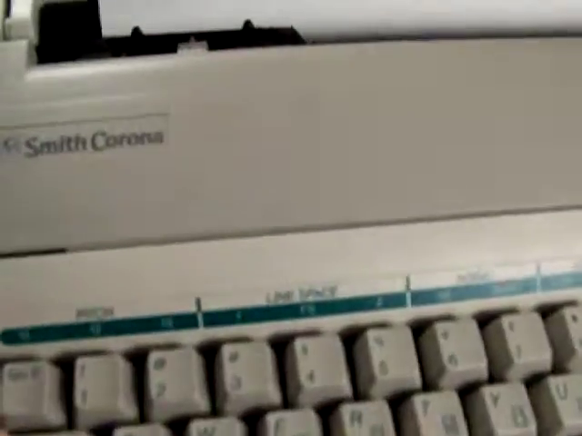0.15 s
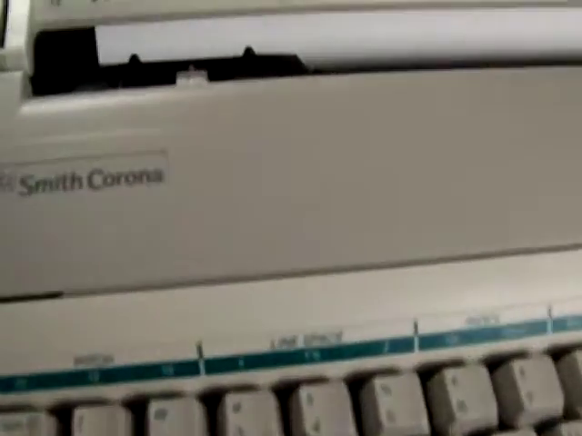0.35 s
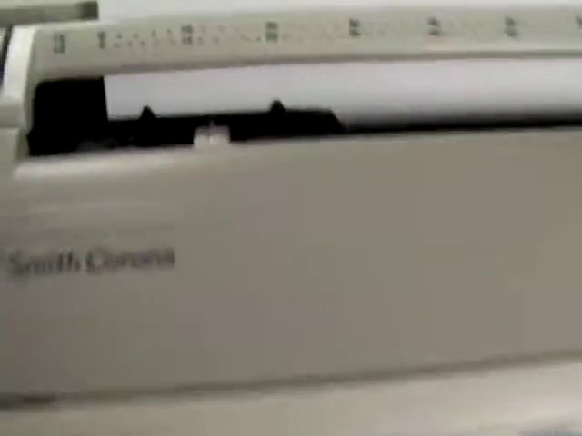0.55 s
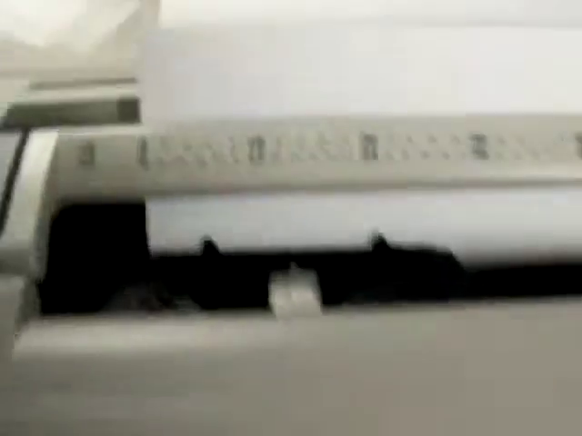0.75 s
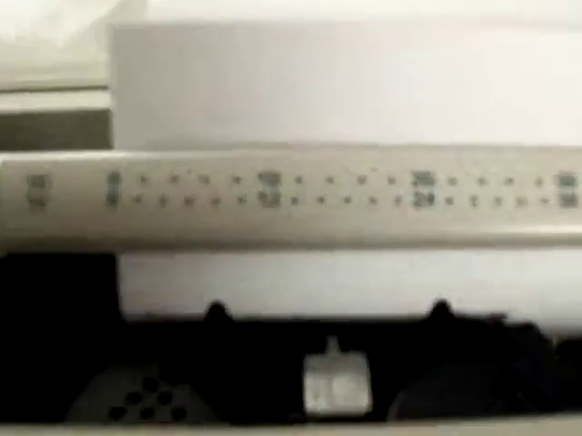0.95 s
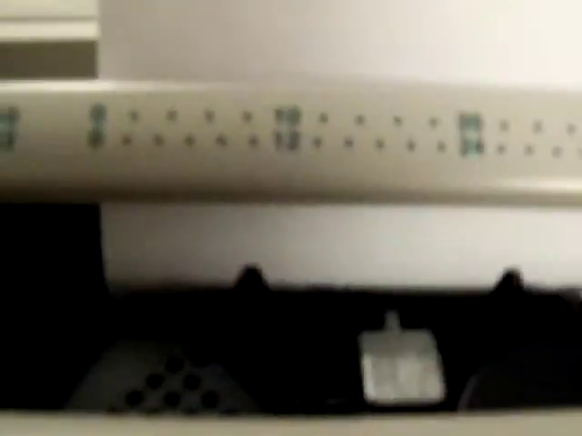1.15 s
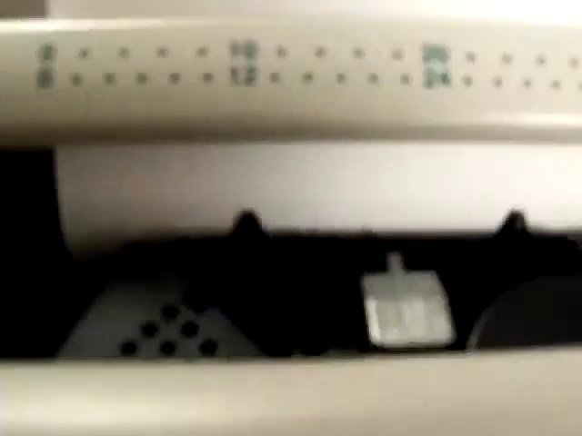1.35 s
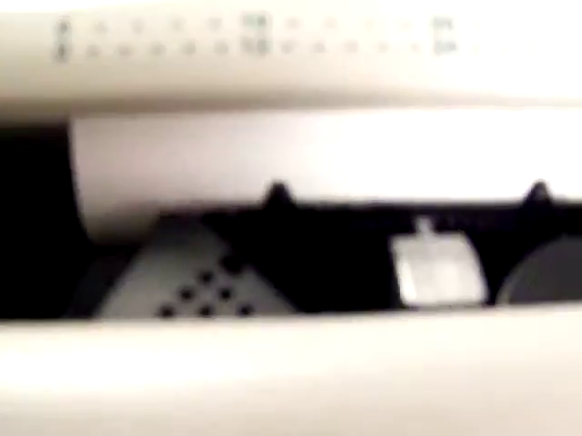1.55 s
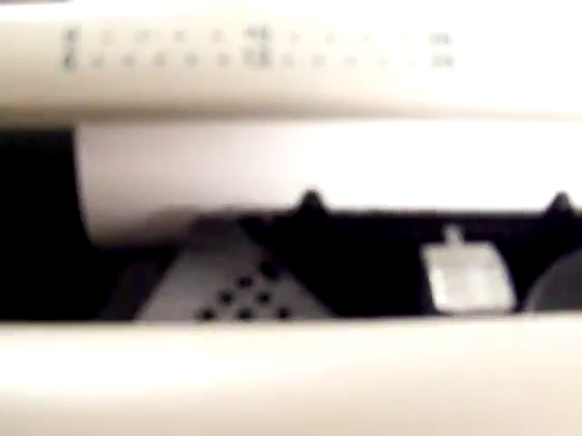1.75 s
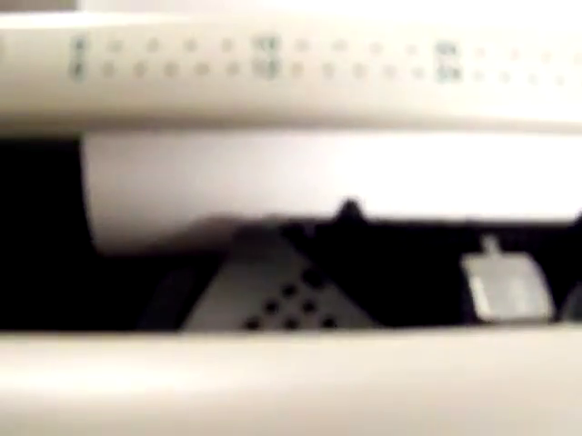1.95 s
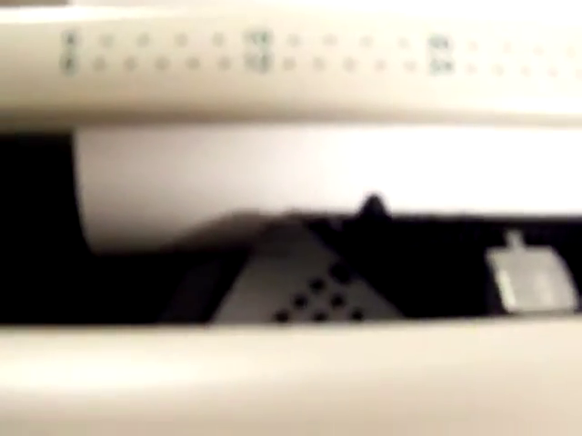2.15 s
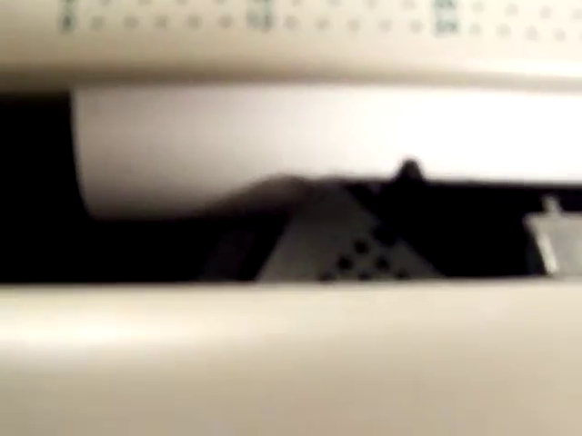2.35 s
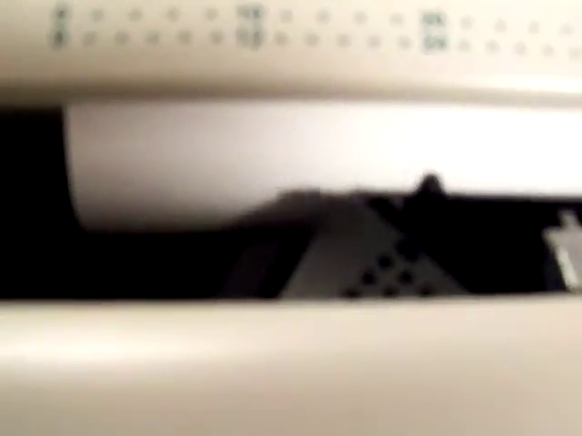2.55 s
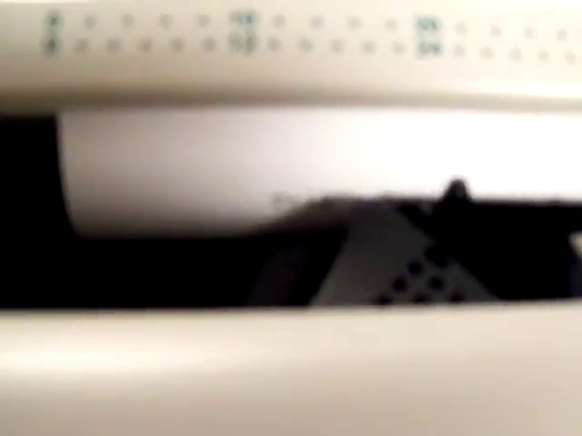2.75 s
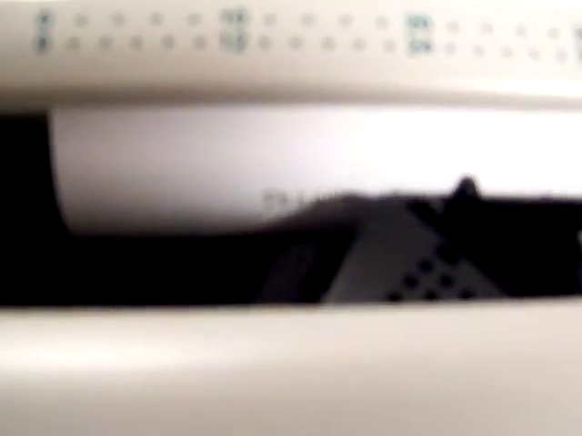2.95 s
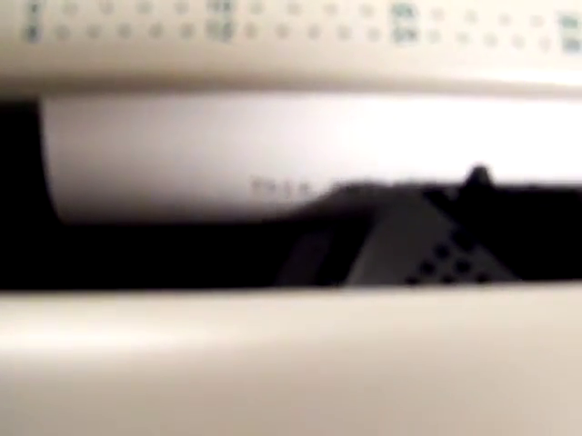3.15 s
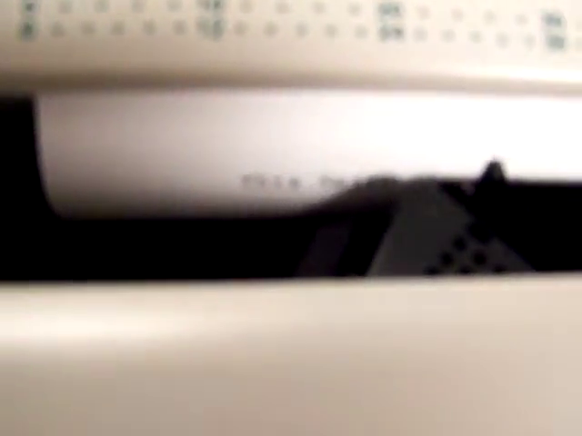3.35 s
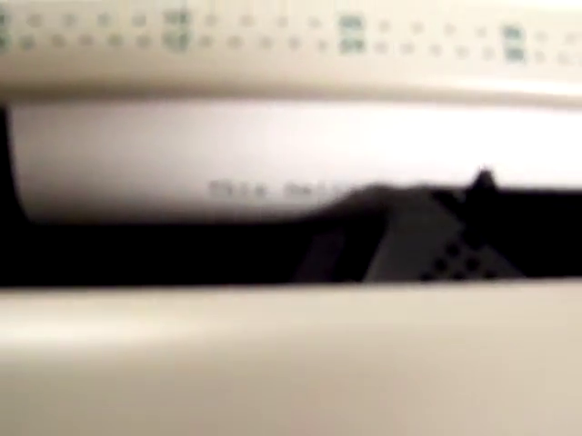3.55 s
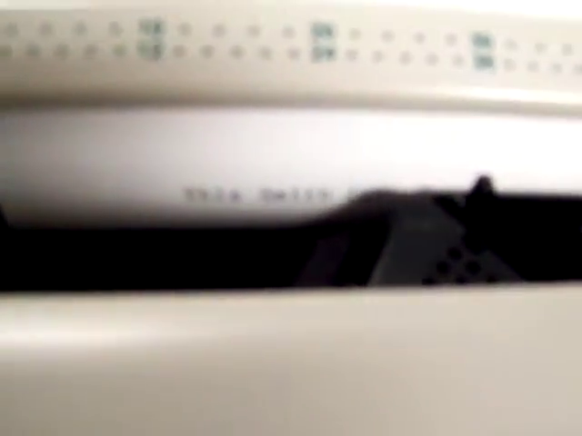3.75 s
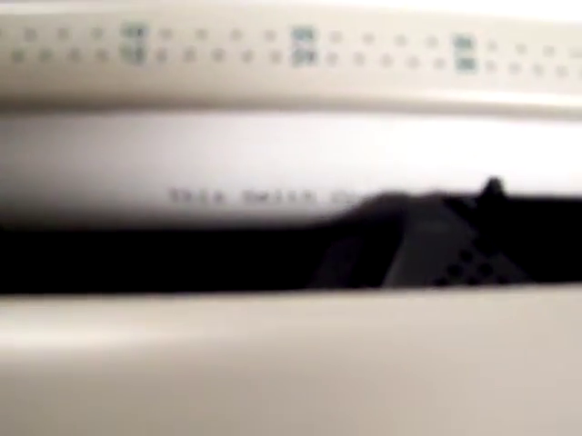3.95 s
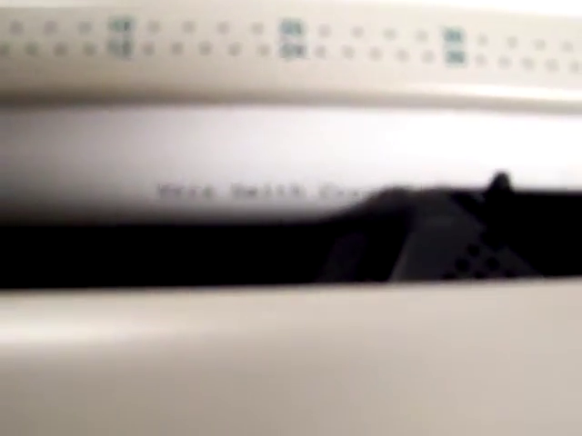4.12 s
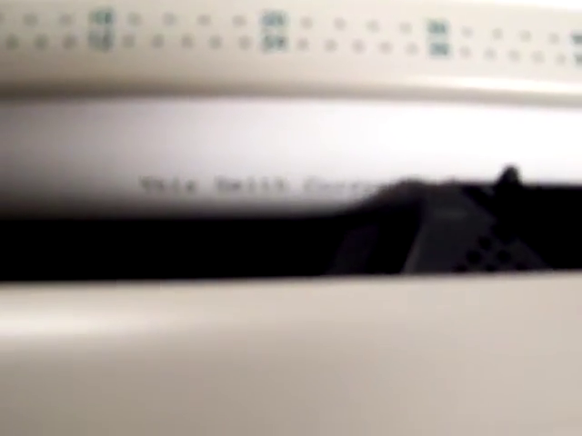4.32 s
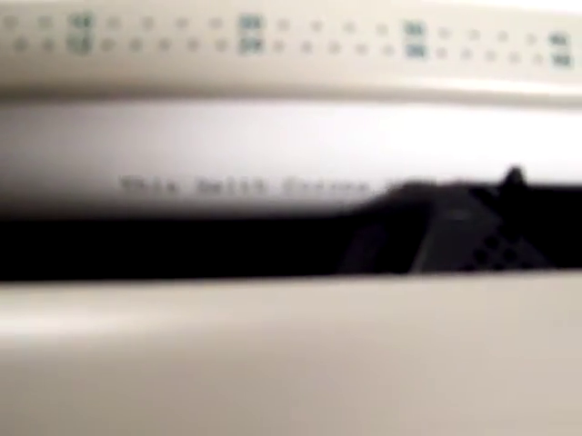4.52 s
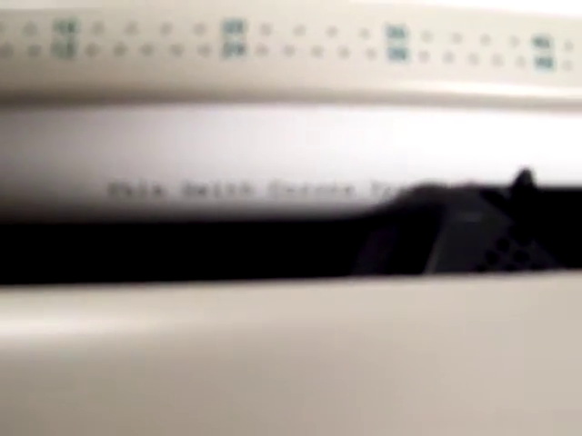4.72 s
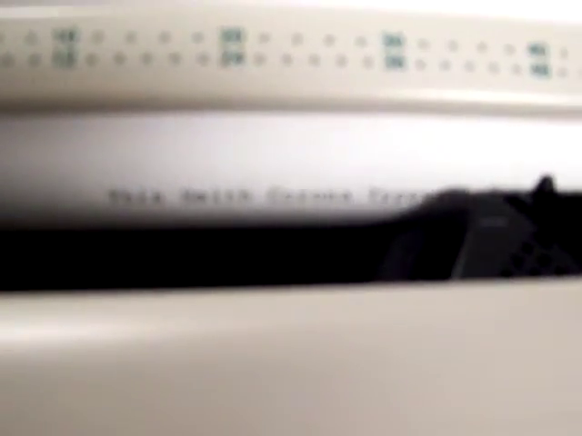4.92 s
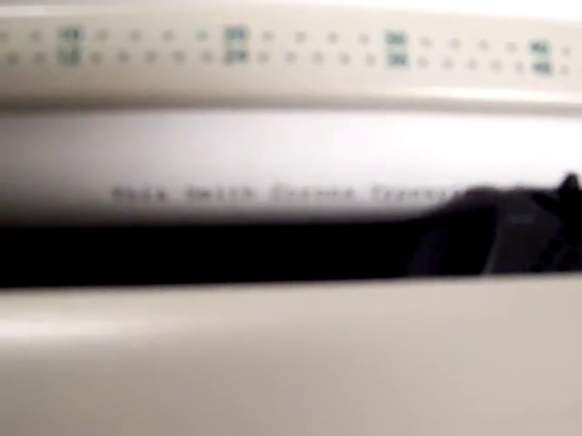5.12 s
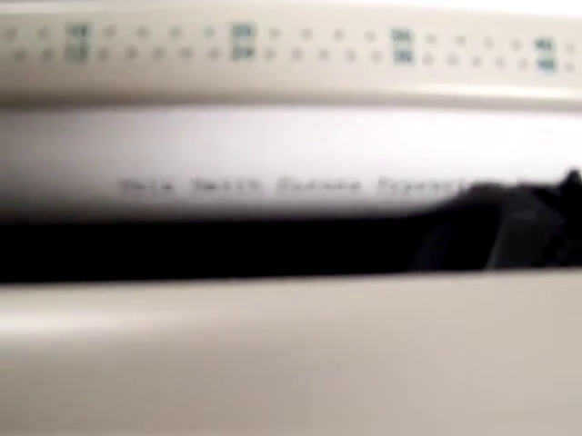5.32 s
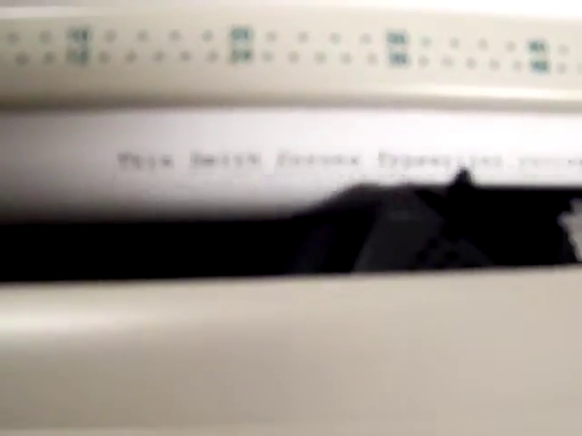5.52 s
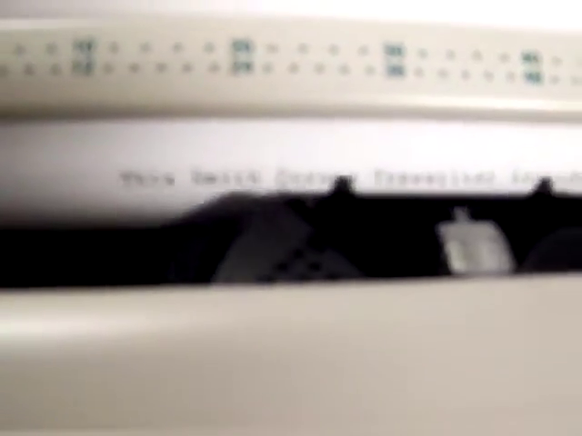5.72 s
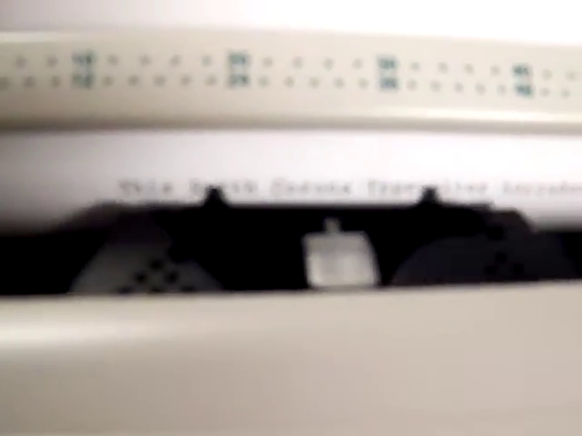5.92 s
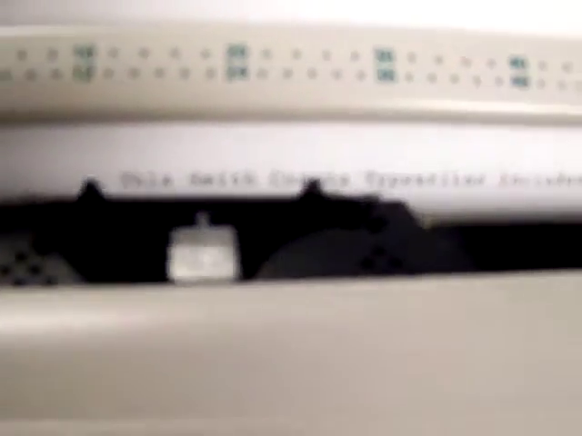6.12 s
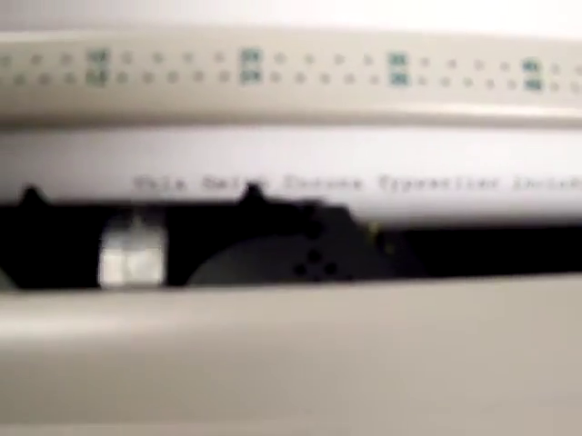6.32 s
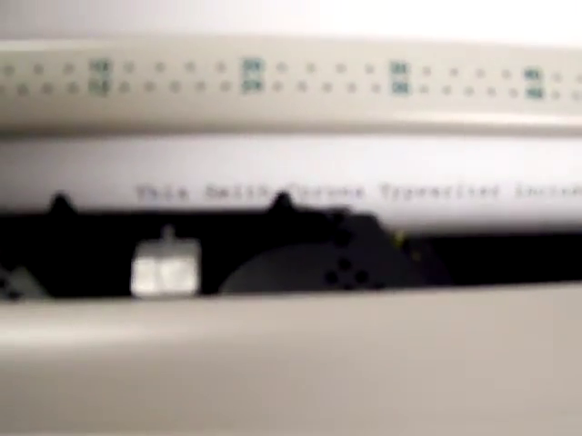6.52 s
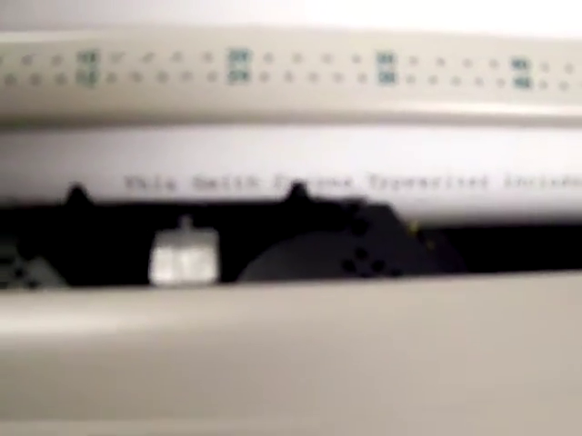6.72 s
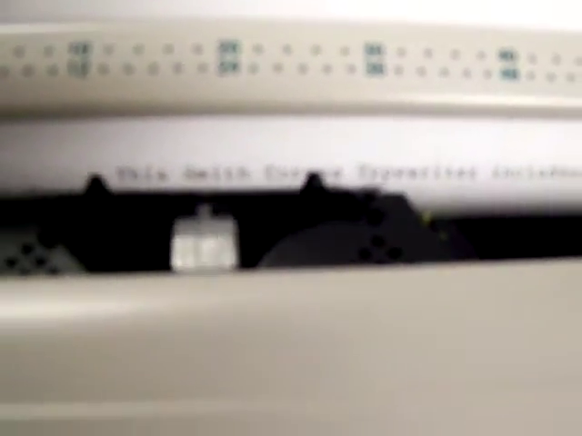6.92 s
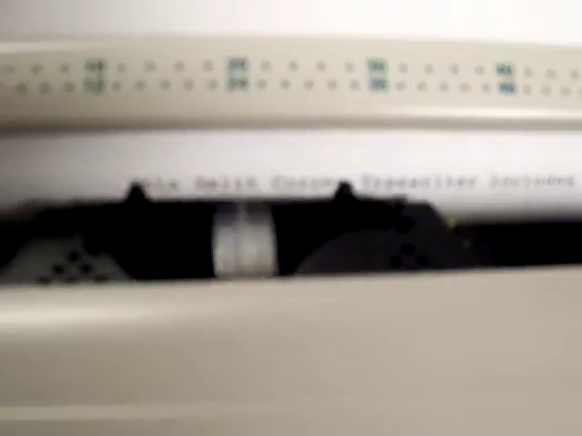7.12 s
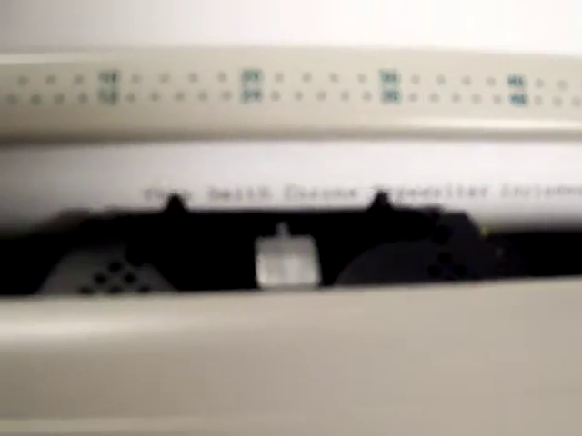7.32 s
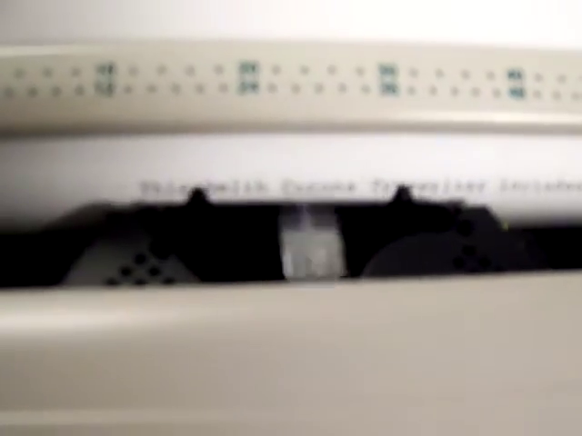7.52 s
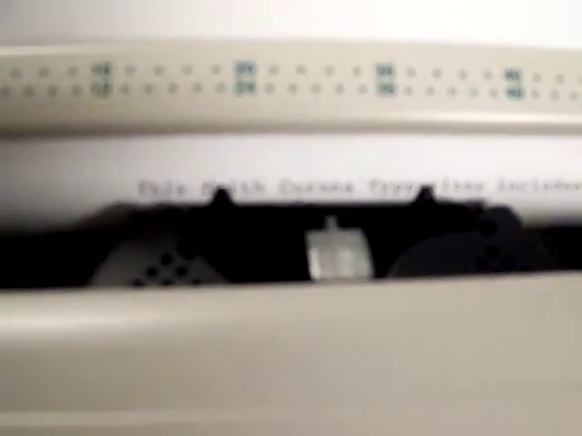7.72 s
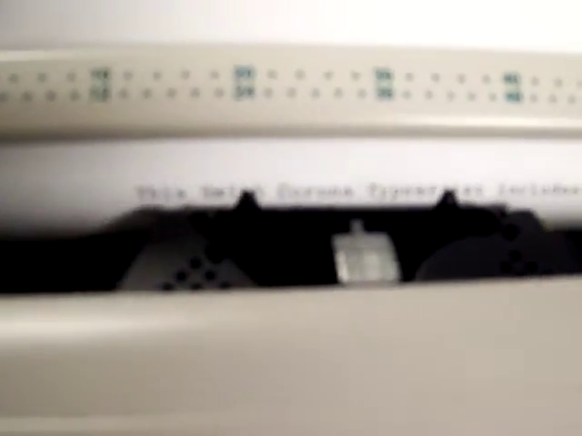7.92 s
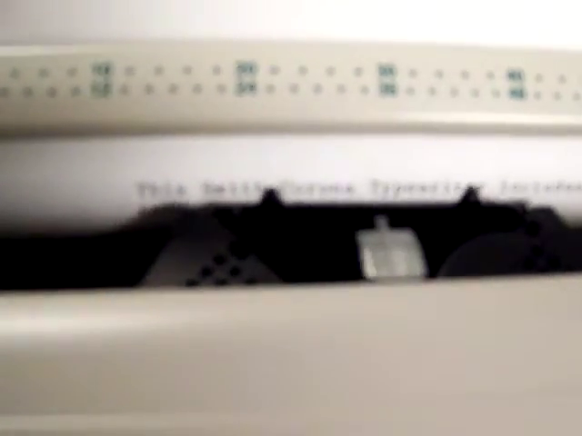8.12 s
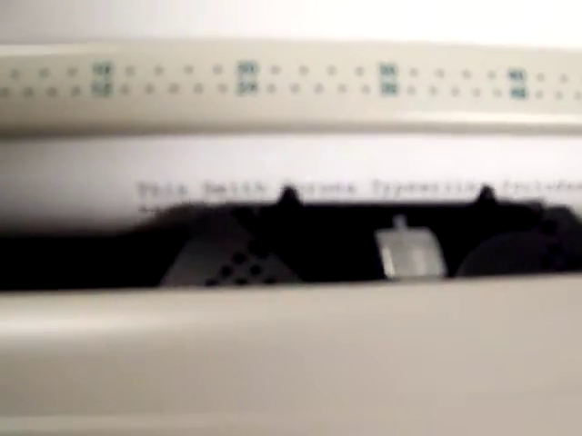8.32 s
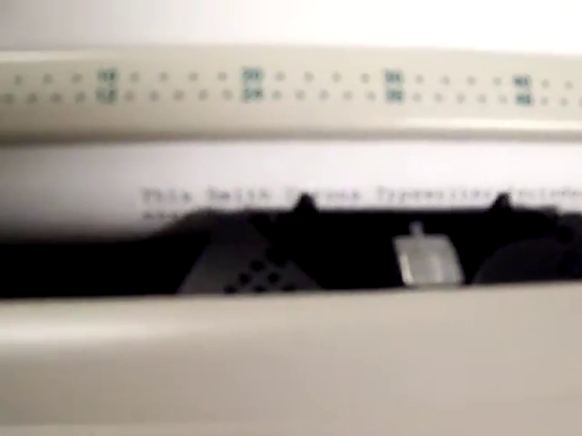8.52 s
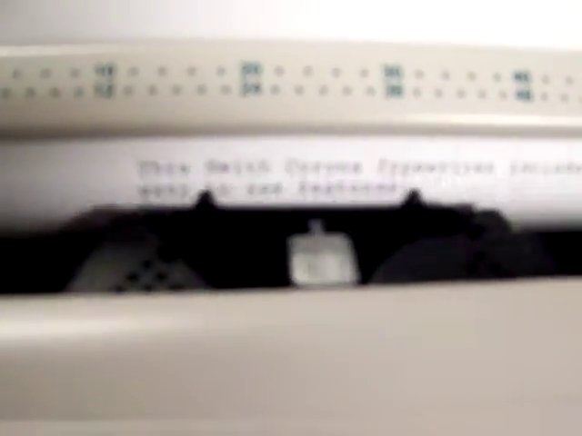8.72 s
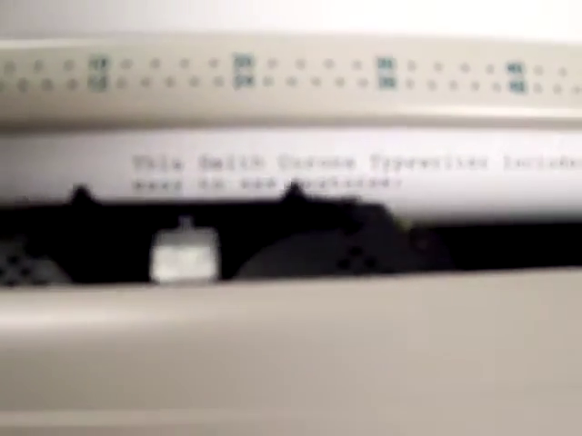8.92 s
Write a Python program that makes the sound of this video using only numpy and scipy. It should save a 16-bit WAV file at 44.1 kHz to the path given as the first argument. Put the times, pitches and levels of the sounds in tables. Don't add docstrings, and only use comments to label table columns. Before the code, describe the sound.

Close, harsh machine-gun rattle of a self-printing typewriter, with gear whirr, brief motor hums, ratchet ticks and a final run of clunks.

```python
import sys
import numpy as np
from scipy import signal
from scipy.io import wavfile
from scipy.ndimage import uniform_filter1d

SR = 44100
rng = np.random.default_rng(int(sys.argv[2]) if len(sys.argv) > 2 else 0)


def makeup_ratio(level_db):
    decades = np.asarray(level_db, float) / 20
    return 10 ** decades


def materialize(psi):
    bounded = np.clip(np.atleast_2d(psi).T, -1, 1)
    quanta = np.round(bounded * 32767).astype(np.int16)
    wavfile.write(sys.argv[1], SR, quanta)


N = 399722


def evened(x):
    return x / np.sqrt(np.mean(x ** 2) + 1e-20)


def smooth_noise(size):
    return evened(uniform_filter1d(uniform_filter1d(rng.standard_normal(N), size), size))


def add(mix, s, sound):
    part = mix[..., round(s * SR):][..., :sound.shape[-1]]
    part += sound[..., :part.shape[-1]]


def colour(points):
    f, db = np.transpose(points)
    hz = abs(np.fft.fftfreq(4096, 1 / SR))
    level = np.interp(np.log(hz + 1), np.log(f), db, right=db[-1] - 36.5)
    log_gain = level * np.log(10) / 20
    return np.fft.ifft(np.exp(np.conj(signal.hilbert(log_gain)))).real[:2048]


def burst(power, s, db, rise_ms, decay_ms):
    ms = np.arange(-12 * 44, 60 * 44) * 1000 / SR
    rise = np.exp(-(ms / max(rise_ms, .1)) ** 2)
    fall = np.exp(-2 * np.maximum(ms, 0) / max(decay_ms, .3))
    add(power, s + ms[0] / 1000, makeup_ratio(2 * np.asarray(db))[:, None] * np.where(ms < 0, rise, fall))


# t/s, level/dB
WHIRR = [(0, -42.5), (.2, -26.5), (.35, -26), (.45, -35), (.5, -47), (.53, -37.5), (.7, -27.5), (1.05, -27),
         (1.14, -25.5), (5.1, -25.5), (5.24, -36.5), (5.48, -36.5), (6.25, -46.5), (6.27, -24), (8.52, -28),
         (8.55, -38), (8.96, -39), (8.972, -50)]
# t/s, level/dB, time to rise 10 dB/ms, time to fall 10 dB/ms
SURGES = [(.075, -20.5, 14, 104), (.51, -32, 14, 36), (0.61, -19.5, 35, 60), (.46, -22.5, 18, 16),
          (.385, -20, 10, 26), (5.1, -21.5, 206, 120), (5.504, -23.5, 3, 53), (5.64, -39.5, 300, 1498),
          (6.2, -27, 33, 9), (8.78, -30.5, 41, 83), (8.95, -36, 70, 33), (9.012, -32.5, 10, 57)]


def whirr_db():
    ms = np.arange(0, N * 1000 / SR + 1, .5)
    level = np.interp(ms / 1000, *np.transpose(WHIRR))
    for s, db, rise_ms, fall_ms in SURGES:
        fallen = np.maximum((1000 * s - ms) / rise_ms, (ms - 1000 * s) / fall_ms)
        level = np.maximum(level, db - 10 * fallen)
    hush_ms, hush_width_ms = 71, 19
    lull_ms, lull_db = 10.5, -7.5
    for s, _, _, hush_db in SPACES:
        since = ms - 1000 * s
        level += hush_db * np.clip(1 - abs(since - hush_ms) / hush_width_ms, 0, 1)
        level += lull_db * np.clip(1 - abs(since / lull_ms + 1), 0, 1)
    brace_ms, brace_db = 7.4, -7
    for row in STRIKES:
        before = 1000 * row[0] - ms
        level += brace_db * np.clip(2 - before / brace_ms, 0, 1) * (before > 0)
    return np.interp(np.arange(N) * 1000 / SR, ms, level)


# f/Hz, level/dB per Hz
ROOM = [(20, -12.5), (50, 0.5), (80, -1), (130, -3.5), (200, -6.5), (300, -11.5), (500, -8), (1000, -18.5),
        (2500, -24)]


def room():
    shared, left, right = rng.standard_normal((3, N))
    sides = np.array([shared + 0.11 * left, 1.23 * shared + 0.34 * right])
    wash = signal.oaconvolve(sides, colour(ROOM)[None], axes=1)[:, :N]
    busy = makeup_ratio(.5 * (whirr_db() + 45.0))
    return makeup_ratio(-45.5) * busy * evened(wash)


# f/Hz, level/dB
LEFT = [(170, -29), (400, -18), (800, -21), (1500, -22), (2600, -19), (3250, -13), (4300, -16),
        (6000, -10.5), (7150, -6.5), (7600, -10), (8000, -19.5), (8400, -31)]
# f/Hz, level/dB
RIGHT = [(170, -27), (400, -17.5), (800, -19.5), (1500, -18.5), (2500, -9.5), (3150, 0.5), (3700, -1.5),
         (4500, 1), (5100, -6), (6200, -14.5), (7500, -31), (8400, -34.5)]
# f/Hz, level/dB
GEARS = [(60, -5), (2000, -0.5), (3200, -3), (4300, -1), (4680, 1.5), (4950, -3), (7300, -2), (8000, 4)]


def chatter():
    shared, left, right = rng.standard_normal((3, N))
    same = 0.63
    drive = same * shared + np.sqrt(1 - same ** 2) * np.array([left, right])
    drive = drive * evened(makeup_ratio(2.3 * smooth_noise(36)))
    z = signal.stft(drive, nperseg=128, noverlap=96)[2]
    patches = uniform_filter1d(rng.standard_normal(z.shape[::-1][:2]), size=9, axis=0)
    patches = evened(makeup_ratio(2.2 * evened(uniform_filter1d(patches, size=2, axis=1))))
    return signal.istft(z * patches.T, nperseg=128, noverlap=96)[1][:, :N]


def rattle(letters, gears):
    drive = chatter()
    habit = np.zeros((2, N))
    for row in STRIKES:
        add(habit, row[0] - .005, drive[:, :4000])
    from_letters = (.9 * drive + .43 * habit) * np.sqrt(letters)
    from_gears = drive[:, ::-1] * np.sqrt(gears)
    from_gears = signal.oaconvolve(from_gears, colour(GEARS)[None, :400], axes=1)[:, :N]
    taps = np.array([colour(LEFT), colour(RIGHT)])
    taps /= np.sqrt((taps ** 2).sum() / 2)
    return signal.oaconvolve(from_letters + from_gears, taps, axes=1)[:, :N]


# f/Hz, level/dB
MAINS = [
    (59.6, -65),
    (2540, -66),
    (4560, -58),
    (5560, -63.5),
]


def supply_tones():
    t = np.arange(N) / SR
    return sum(makeup_ratio(db) * np.sin(2 * np.pi * hz * t) for hz, db in MAINS)


# t/s, level/dB, length/ms, ring f/Hz
WAKING = [(.0635, -9, 1.17, 3600), (.067, -11, 1.5, 3080), (.0758, -3, 0.67, 3830), (.078, -11, 0.86, 4300),
          (.0795, 0, 0.87, 4020), (.0865, -9, 0.95, 3960), (.097, -24, 3, 4300), (.1075, -4, 1.4, 4230),
          (.111, -13, 1.5, 4400), (.2385, 1, 0.22, 6400), (.2388, -16, 1.15, 4500), (.27, -24, 1.7, 3980),
          (.2915, -5.5, 1.3, 4000), (.296, -10, 1.5, 4300), (.309, -11, 1.5, 4600), (.312, -9, 2, 4500),
          (.3155, -1.5, 0.93, 4600), (.3155, -17, 1.1, 6850), (.33, -3, 1.1, 3750), (.333, 1, 1.75, 3800),
          (.336, -10, 2.2, 3930), (.3425, -3.5, 2, 3470), (.345, -9, 2.2, 4600), (.373, -20, 3, 4860),
          (.379, -13, 3.1, 3660), (.387, -15, 3, 7000), (.393, -10.5, 3.3, 5040), (.44, -29, 2, 6500),
          (.466, -12.5, 2, 4680), (.47, -21, 2.3, 4600), (.505, -30, 3, 3400), (.527, -31, 1.4, 4300),
          (.547, -5.5, 1.04, 3540), (.5495, -7.5, 1.4, 4150), (.56, -23, 1.1, 3260), (.564, -13, 2, 3270),
          (.594, -28, 4, 3500), (.605, -33, 3, 4200), (.613, -19, 3, 3260), (.71, -23, 2.4, 3420)]
# t/s, level/dB, length/ms, ring f/Hz
RETURNS = [(1.128, -8, 5, 7300), (1.975, -15, 2.8, 4410), (5.225, -15.5, 2.8, 4000),
           (5.303, -25, 1.9, 4730), (5.325, -24, 1.7, 4630), (5.5, -25.5, 1.7, 4680),
           (5.507, -11, 2.5, 4840), (5.512, -10, 2.3, 4260), (5.52, -12, 3, 4740), (5.539, -8, 0.5, 4800),
           (5.589, -22, 6.8, 4400), (6.173, -12, 1.8, 4500), (6.178, -13.5, 2.8, 4700),
           (6.191, -12, 2.8, 4580), (7.39, -8.5, 2, 7200), (7.394, -11, 3, 3450), (7.322, -14, 3, 4700),
           (7.426, -20, 2, 3400), (7.433, -20, 2, 4500), (2.698, -19, 2.5, 4330), (2.656, -20, 2.5, 4200),
           (4.662, -10, 2, 4500), (4.878, -15, 1.2, 4300), (1.226, -4, 1.5, 4100), (5.517, -18, 3.63, 7030),
           (8.367, -15, 1.4, 4300), (8.48, -18, 2.94, 4800), (8.49, -21, 2.3, 4500),
           (8.512, -22, 3.4, 4720), (8.7, -25, 3, 4700), (8.708, -25, 2.8, 4150), (8.525, -27.5, 4, 4620),
           (8.888, -29, 3, 4270), (8.909, -26, 3, 4360), (8.755, -8, 2.6, 4490), (8.762, -6.5, 2, 4700),
           (8.769, -13, 2, 4430), (8.777, -17, 1.7, 4500), (8.764, -19, 2.3, 7200), (8.776, -20, 2.4, 7200),
           (8.773, -14, 2, 5500), (8.786, -22, 3, 4500), (8.84, -26.5, 5.1, 4500), (8.948, -20, 2.4, 3130),
           (8.95, -23, 2.4, 4600), (8.96, -29, 3, 4340), (9.01, -34, 2.5, 4180)]
# start t/s, engage level/dB, stop level/dB, hush before next blow level/dB
SPACES = [(1.074, -11.5, -40, -3), (1.287, -11.5, -40, 4), (1.769, -11, -6.5, -1), (2.526, -9.5, -15, -8),
          (2.702, -18, -40, -5), (3.728, -11.5, -17, -9), (4.645, -13, -20, -14), (6.668, -14.5, -14, -16),
          (6.96, -13, -14.5, -16), (7.375, -35, -14, -10), (8.338, -10.5, -23, 4)]
# t/ms after its start, level/dB, length/ms, ring f/Hz
ENGAGE = [
    (0, 0, 3.5, 4070),
    (16, -4, 2.5, 4300),
]
# t/ms after its start, level/dB, length/ms, ring f/Hz
STOP = [
    (38, 0, 2.5, 4350),
    (46, -6, 2.4, 4300),
    (53, -8, 3, 3300),
]
# t/s, level/dB, length/ms, ring f/Hz
RATCHET = [(5.636, -24, 2, 4800), (5.651, -22, 1.8, 4600), (5.657, -16, 2.5, 4620), (5.688, -21, 2, 4700),
           (5.719, -18, 1.8, 4580), (5.75, -18, 2.1, 4600), (5.756, -20, 1.5, 4600),
           (5.786, -17.5, 1.47, 4580), (5.816, -19, 1.5, 4600), (5.823, -20, 1.97, 4640),
           (5.855, -19, 1.5, 4540), (5.861, -19, 1.8, 4610)]


def knock_rows():
    moves = []
    for start, engage_db, stop_db, _ in SPACES:
        for db, parts in ((engage_db, ENGAGE), (stop_db, STOP)):
            for ms, over_db, length, hz in parts:
                moves.append((start + ms / 1000, db + over_db, length, hz))
    return WAKING + RETURNS + moves + RATCHET


def knocks():
    power, rings = makeup_ratio(2 * whirr_db()) * np.ones((2, 1)), np.zeros((2, N))
    t, rows = np.arange(1500) / SR, knock_rows()
    carriage_back_s = 5.49
    for (s, db, ms, hz), (side, detune) in zip(rows, rng.standard_normal((len(rows), 2))):
        pan_db = -11 + 3.5 * side
        rattle_db = db - 5.5 + ms / 2
        if carriage_back_s <= s <= RATCHET[-1][0]:
            rattle_db -= 4.5
        if s < STRIKES[0][0]:
            rattle_db -= 1
        burst(power, s, rattle_db + np.array([.8 * (pan_db + 12), 0]), .45 * ms, 1.6 * ms)
        tone = np.sin(2 * np.pi * hz * (1 + 0.0073 * detune + 0.0065) * t)
        swell = np.exp(-t / (0.001 * ms)) * (1 - np.exp(-t / (0.00066 * ms)))
        ring_db = db + 9.5 - ms + np.array([[pan_db - 8], [0]])
        add(rings, s - .0003 * ms, makeup_ratio(ring_db) * tone * swell)
    return power, rings


# t/s, level/dB, f/Hz
THUDS = [(0.071, -30, 590), (.085, -33, 109), (0.104, -32.5, 200), (.315, -30, 416), (0.516, -33.5, 560),
         (0.339, -28.5, 960), (0.375, -31, 227), (0.457, -30.5, 470), (5.237, -35.5, 180),
         (5.444, -35, 344), (5.499, -37, 210), (5.585, -35.5, 497), (5.64, -34, 327), (5.655, -39.5, 145),
         (6.164, -40, 190), (6.185, -36, 110), (8.491, -40, 178), (8.501, -43, 175), (8.752, -31.5, 210),
         (8.839, -35, 530), (8.705, -36.5, 420), (8.76, -40, 796), (8.895, -38, 106), (8.925, -35, 101),
         (8.92, -36, 203), (8.795, -38, 477), (8.909, -36, 470), (8.953, -38, 610), (9.011, -38.5, 405),
         (9.018, -37, 109)]


def thuds():
    out, t = np.zeros(N), np.arange(4000) / SR
    for s, db, hz in THUDS:
        cycles = t * hz ** 0.42 / 0.095
        low_pass = signal.butter(2, min(3.15 * hz, 5000), fs=SR)
        rough = evened(signal.lfilter(*low_pass, rng.standard_normal(4000)))
        body = np.sin(2 * np.pi * hz * t) + 0.5 * rough
        add(out, s, makeup_ratio(db) * cycles * np.exp(1 - cycles) * body)
    return out


# start t/s, end t/s, third-order level/dB, other orders level/dB, swell/s
HUM = [
    (0.127, 0.311, -32, -48.5, 0.03),
    (0.368, 0.467, -30, -47, 0.028),
    (5.247, 5.47, -36, -57, 0.021),
    (5.492, 5.599, -31.5, -52.5, 0.0084),
    (5.672, 5.838, -49, -53, 0.02),
    (5.798, 6.174, -41, -51.5, 0.062),
    (8.507, 8.757, -41.5, -57, 0.04),
    (8.761, 8.823, -32, -53, 0.013),
    (8.824, 8.904, -42, -50.5, 0.012),
    (9.024, 9.064, -46, -64, 0.018),
]
# multiple of the step rate, level/dB
ORDERS_DB = [(1, 3), (2, 7), (5, -3), (6, -2), (8, -7), (10, -12), (12, -13.5)]


def stepper_motors():
    out, step_hz = np.zeros(N), 133.5
    phases = rng.random(len(ORDERS_DB))
    waver = makeup_ratio(1.1 * smooth_noise(900))
    for start, end, third_db, stack_db, swell in HUM:
        run = slice(round(start * SR), round(end * SR))
        since = np.arange(N)[run] / SR - start
        speed = 1 - 0.11 * np.exp(-4 * since / swell) + 0.047 * np.log(waver[run])
        turns = step_hz * np.cumsum(speed) / SR
        stack = sum(makeup_ratio(db) * np.sin(2 * np.pi * (k * turns + phase))
                    for (k, db), phase in zip(ORDERS_DB, phases))
        third = np.sin(2 * np.pi * 3 * turns)
        fade = np.minimum(since / swell, (since[-1] - since) / 0.0034)
        on = np.clip(fade, 0, 1) * waver[run]
        add(out, start, on * (makeup_ratio(third_db) * third + makeup_ratio(stack_db) * stack))
    return out


# t/s, rebound level/dB, ribbon pawl level/dB, microphone jolt level/dB
LINE_START = [(0.6325, -7, -9.5, -19.5), (0.7666, -7, -10, -19), (0.8702, -8, -9.5, -37),
              (0.9767, -4.5, -10, -12.5), (1.1773, -4, -11, -2), (1.3377, -2.5, -10, -3),
              (1.4632, -6.5, -9.5, -9), (1.5627, -3, -11, -12.5), (1.662, -4, -11, -11.5),
              (1.8571, -4, -9.5, -2.5), (1.9832, -6, -10, -8), (2.1, -5, -9, -10.5), (2.2152, -5, -10, -10),
              (2.315, -4.5, -9, -9.5), (2.4191, -6, -9.5, -10), (2.6064, -4, -9.5, -12.5),
              (2.7503, -4.5, -9, -12.5), (2.8491, -6.5, -7, -12), (2.968, -5, -8, -11)]
# t/s, rebound level/dB, ribbon pawl level/dB, microphone jolt level/dB
LINE_END = [(3.0789, -4, -11, -13.5), (3.1822, -4, -8.5, -18), (3.3016, -6, -10, -15.5),
            (3.3998, -9, -8.5, -11), (3.4997, -5, -7, -16), (3.6208, -4.5, -5, -19), (3.808, -4, -8.5, -16),
            (3.9077, -3.5, -9, -16), (4.0137, -4, -6, -23), (4.1136, -4, -8, -28),
            (4.2313, -3.5, -6, -22.5), (4.3313, -6.5, -7.5, -41), (4.4377, -3.5, -9, -35),
            (4.5428, -3.5, -9.5, -48), (4.7289, -2, -10.5, -24), (4.8292, -4.5, -7, -37),
            (4.9289, -4.5, -7.5, -37), (5.0322, -3, -8.5, -43), (5.138, -6, -9, -22)]
# t/s, rebound level/dB, ribbon pawl level/dB, microphone jolt level/dB
NEXT_LINE = [(6.255, -11.5, -16, -25), (6.354, -6.5, -11, -30), (6.468, -6.5, -11, -18),
             (6.567, -6.5, -7, -16), (6.754, -8, -11, -24), (6.858, -3.5, -10.5, -36),
             (7.0459, -5.5, -9, -25), (7.162, -7.5, -10.5, -19), (7.266, -9, -9, -21),
             (7.4534, -5, -9, -17), (7.572, -5.5, -7, -18), (7.672, -4.5, -10.5, -13.5),
             (7.777, -7, -9, -33), (7.888, -7, -8, -20), (7.9986, -5.5, -8, -16.5), (8.1199, -6.5, -7, -15),
             (8.2242, -7, -11, -17), (8.3876, -9, -10, -23)]
STRIKES = LINE_START + LINE_END + NEXT_LINE
# t/ms after the blow, rise/ms, decay/ms, level/dB over its column
FLIGHT, BLOW, CLATTER = (-1.5, 3.2, 7, -9.5), (0.34, 0.27, 6.7, 3.9), (9.8, 7.2, 12.2, 1.56)
LATCH, REBOUND = (24, -0.5, 4.5, -9.5), (30.5, 3.5, 6.5, -6)
STEP, PAWL = (49.6, 3.4, 23, 0.94), (74, 1.56, 4.5, -2.5)


def effort():
    power = np.zeros((2, N))
    sides = rng.normal(0, 2.9, (len(STRIKES), 7))
    gaps = np.diff(np.transpose(STRIKES)[0], append=N / SR)
    step_levels = np.where(gaps > .17, -55, -19.5 - 120 * (gaps - .1))
    blow_db = -9
    for (s, rebound, pawl, _), step, side in zip(STRIKES, step_levels, sides):
        parts = [(FLIGHT, blow_db, -2), (BLOW, blow_db, 8), (CLATTER, blow_db, -3), (LATCH, rebound, -1.5),
                 (REBOUND, rebound, -3), (STEP, step, 0), (PAWL, pawl, -1)]
        for ((ms, rise_ms, decay_ms, over_db), db, left_db), vary in zip(parts, side):
            levels = db + over_db + np.array([left_db + vary, 0])
            burst(power, s + ms / 1000, levels, rise_ms, decay_ms)
        snaps = [(REBOUND, rebound, 0), (PAWL, pawl, -1), (STEP, step, 7.5)]
        for (part, db, snap_db), vary in zip(snaps, side):
            levels = db + snap_db + vary + np.array([-3., 0])
            burst(power, s + (part[0] + 0.27 * vary) / 1000, levels, 0.21, 0.83)
    return power


# f/Hz, t60/s, left level/dB, right level/dB
HAMMER = [(80.4, 0.27, -27, -25.5), (203, 0.21, -30, -27.5), (403, 0.049, -15, -18), (326, 0.023, -27, -35),
          (684, 0.007, -13, -25), (1000, 0.01, -9.5, -10), (1780, 0.026, -22, -7.5),
          (2298, 0.02, -26, -3.5), (3800, 0.0092, -6, -4), (1444, 0.028, -11.5, -36), (3252, 0.039, 3, 9),
          (4230, 0.033, -13, -7.5), (4500, 0.025, -21, -2), (4833, 0.054, -42, -12.5),
          (5887, 0.053, -14.5, -15), (6907, 0.026, -18, -14)]
# t/s, level/dB
TRAVEL = [(.6, -6), (1.5, -3.5), (3.7, -2.5), (4.3, -6.5), (4.6, -11), (4.83, -21), (5.0, -10.5),
          (5.2, -15), (6.2, -4.5), (8.4, -5.5)]


def hammer():
    out, t = np.zeros((2, N)), np.arange(3000) / SR
    attack = 1 - np.exp(-t / .00025)
    bent_t = t + 0.0002544 * (1 - np.exp(-t / 0.00088))
    chance = rng.standard_normal((len(STRIKES), len(HAMMER), 2))
    for row, luck in zip(STRIKES, chance):
        travel_db = np.interp(row[0], *np.transpose(TRAVEL))
        for (hz, t60, *db), (detune, vary) in zip(HAMMER, luck):
            share = 0.29 if hz < 2500 else 1 if hz < 4000 else -.5
            turns = hz * (1 + (0.0082 + 35 / (hz + 100)) * detune / 2) * bent_t
            level = -60 * t / t60 + 1.2 * vary + travel_db * share
            ring = makeup_ratio(level) * np.sin(2 * np.pi * turns) * attack
            add(out, row[0] - .0002, makeup_ratio(db)[:, None] * ring)
    return out


def jolts():
    out, t = np.zeros((2, N)), np.arange(6000) / SR
    low_pass = signal.butter(2, 700, fs=SR)
    shoves = evened(signal.lfilter(*low_pass, rng.standard_normal((len(STRIKES), 6000))))
    push = (1 - np.exp(-t / 0.00045)) * np.exp(-(t / 0.014) ** 2)
    swing_back = 0.32 * np.exp(-((t - .045) / 0.027) ** 2)
    for row, shove in zip(STRIKES, shoves):
        swing = push * (1 + 0.63 * shove) - swing_back
        add(out, row[0], makeup_ratio(row[3]) * np.array([[.08], [.9]]) * swing)
    return out


# f/Hz, rebound level/dB, pawl level/dB, left microphone level/dB
SEATING = [(3105, 2.5, 2, -19), (3400, -3, -1, -14), (4600, -3.5, -3, -14), (4940, -3, -8.5, -12),
           (6280, -38, -24.5, 13), (6830, -26, -20, 17), (7330, -38, -25, 19)]


def seating():
    out, ms = np.zeros((2, N)), np.arange(-400, 800) * 1000 / SR
    seat_ms = 4
    rise = np.exp(-(ms / (0.47 * seat_ms)) ** 2)
    fall = np.exp(-np.maximum(ms, 0) / (1.03 * seat_ms))
    bell = np.where(ms < 0, rise, fall)
    for s, rebound, pawl, _ in STRIKES:
        travel_db = 0.35 * np.interp(s, *np.transpose(TRAVEL))
        for late_ms, db, column in ((REBOUND[0], rebound, 1), (PAWL[0], pawl, 2)):
            for part in SEATING:
                hz, left_db = part[0], part[3]
                detune, vary, phase = rng.standard_normal(3)
                level = db + part[column] + 1.26 * vary
                level += travel_db * (hz < 4000)
                tone = np.sin(2 * np.pi * (hz * (1 + 0.019 * detune) * ms / 1000 + phase))
                add(out, s + (late_ms + ms[0]) / 1000, makeup_ratio(level + np.array([[left_db], [0]])) * bell * tone)
    return out


def scene():
    gears, rings = knocks()
    motors = np.sqrt(2) * makeup_ratio([[-.5], [.5]]) * (supply_tones() + thuds() + stepper_motors())
    return room() + rattle(effort(), gears) + motors + rings + hammer() + jolts() + seating()


def top_cut(x):
    return signal.sosfilt(signal.butter(12, 16300, fs=SR, output="sos"), x)


def record(dry):
    camera_rate = 16000
    taps = signal.firwin(201, 8220, window=("kaiser", 8), fs=SR)[None]
    narrow = signal.oaconvolve(np.clip(dry, -1.15, 1.15), taps, "same")
    loud = np.clip(uniform_filter1d(narrow ** 2, size=200, axis=1) - .1, 0, 1)
    mirror = narrow * np.cos(2 * np.pi * camera_rate * np.arange(N) / SR) * loud
    mirror -= signal.oaconvolve(mirror, taps, "same")
    above = signal.oaconvolve(mirror, signal.firwin(61, 13700, fs=SR)[None], "same")
    return top_cut(np.clip(narrow + makeup_ratio(-11.5) * above, -1, 1))


dry = scene()
out = record(dry)
materialize(out)
```